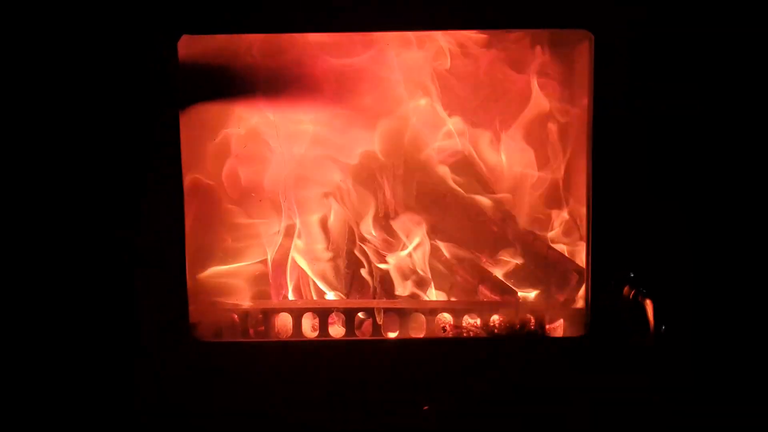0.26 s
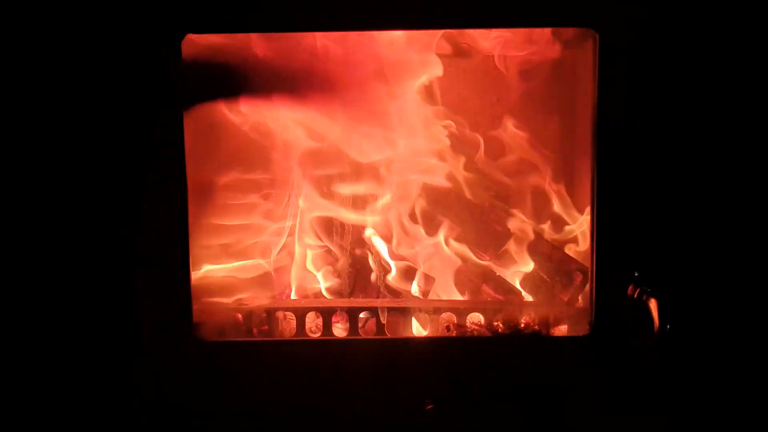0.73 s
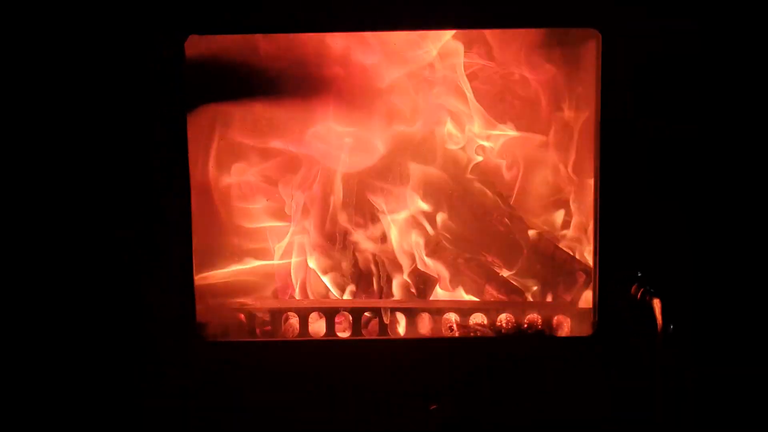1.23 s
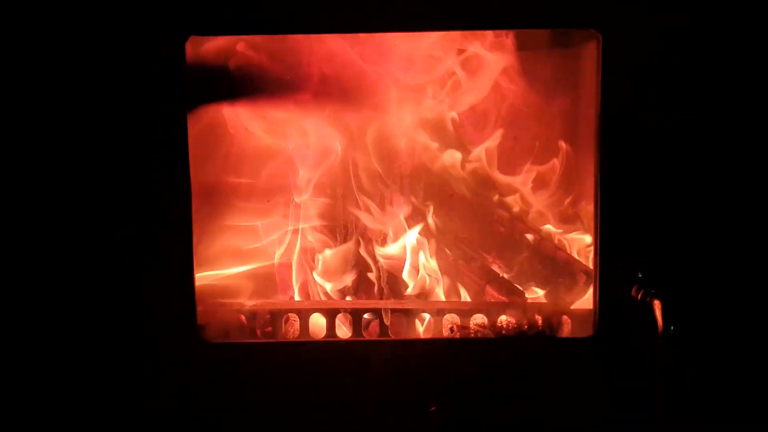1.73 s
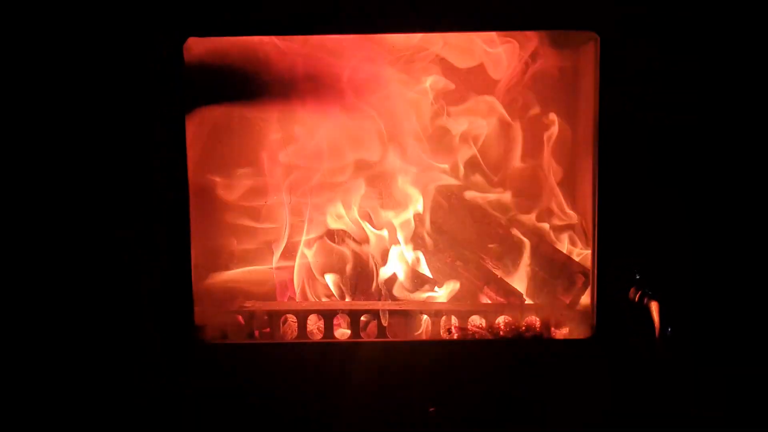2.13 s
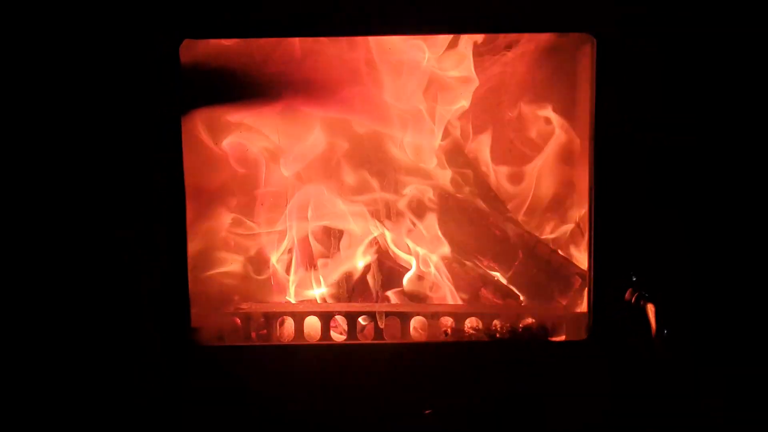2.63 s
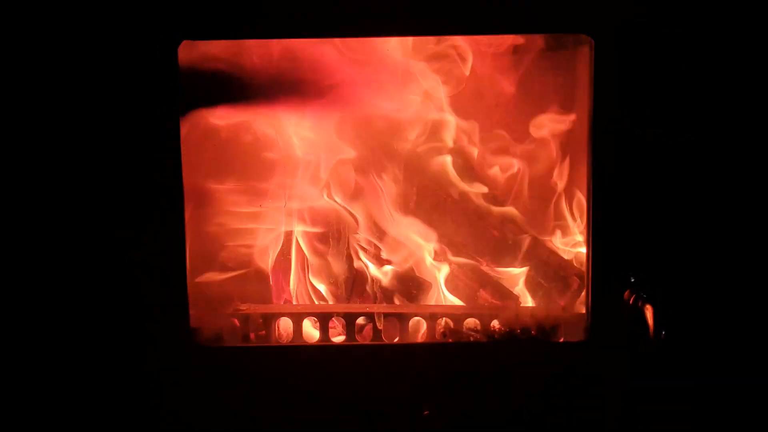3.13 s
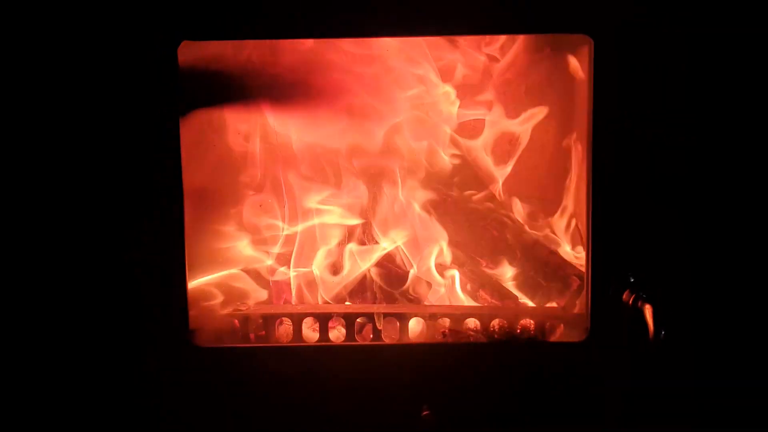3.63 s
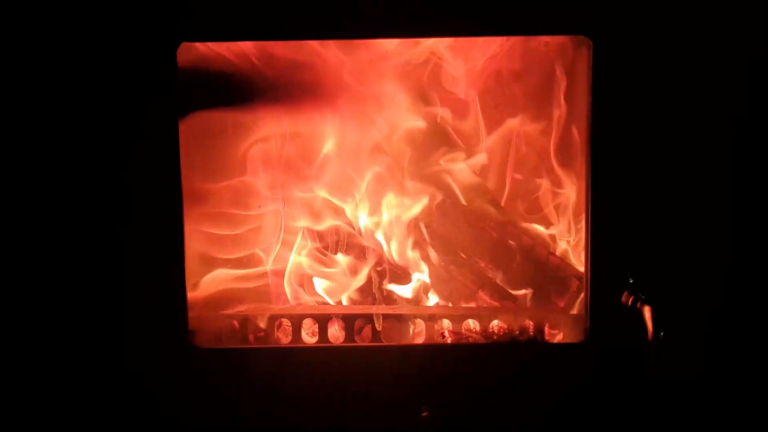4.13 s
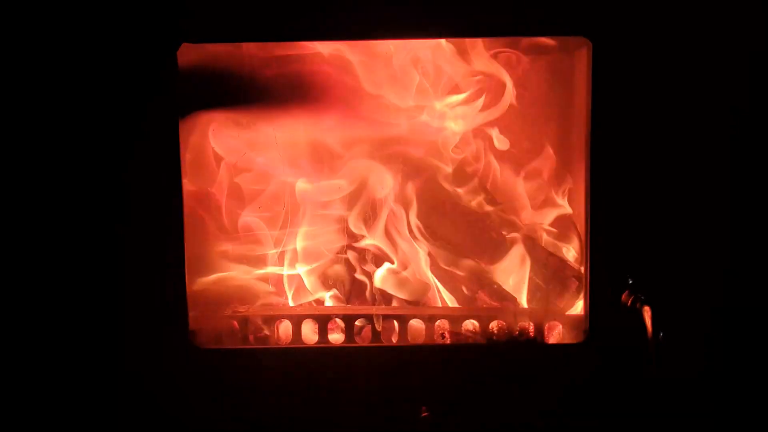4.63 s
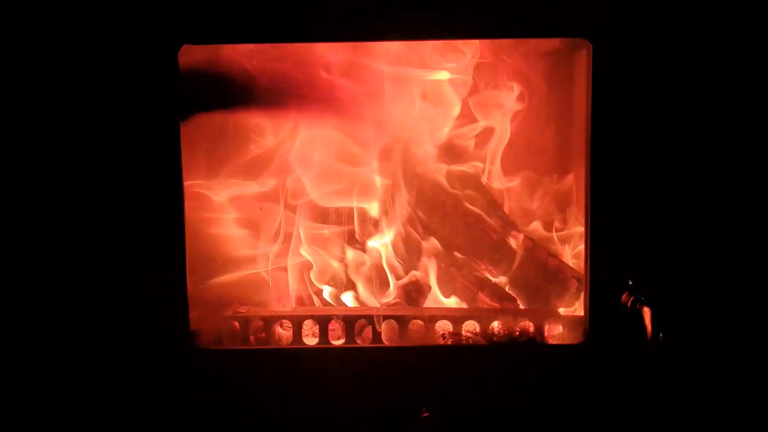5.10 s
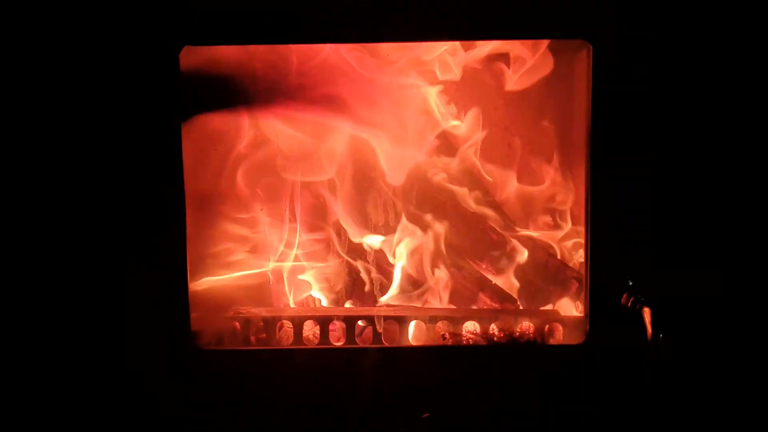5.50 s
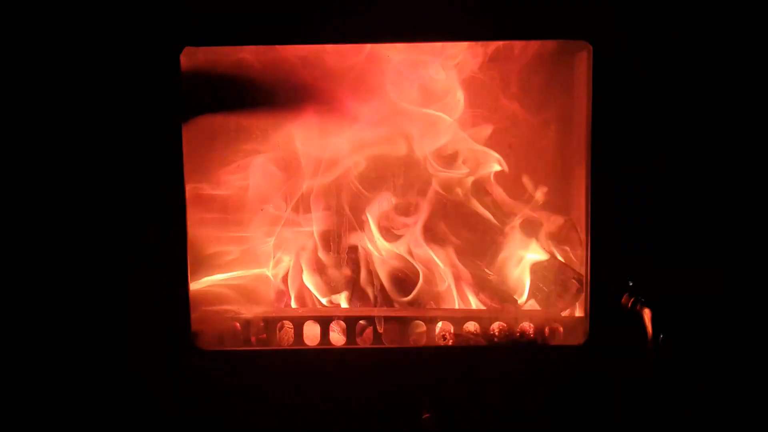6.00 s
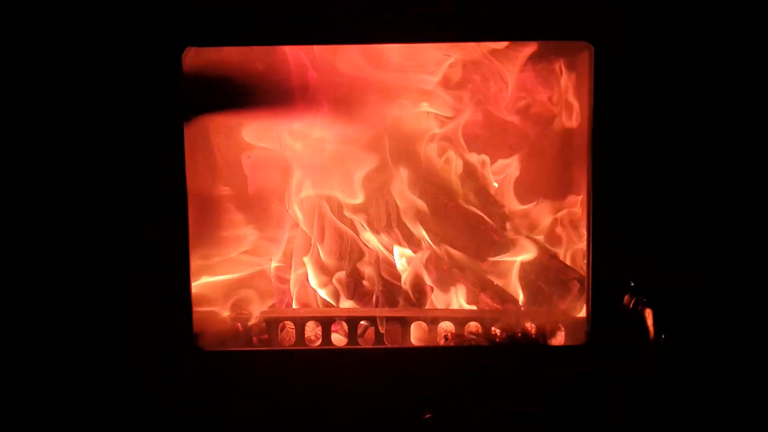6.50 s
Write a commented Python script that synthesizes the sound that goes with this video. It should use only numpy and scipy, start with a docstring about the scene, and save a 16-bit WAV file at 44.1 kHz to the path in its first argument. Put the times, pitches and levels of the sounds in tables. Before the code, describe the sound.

Indoors in a quiet room, a wood fire burns in a closed stove close to a stereo microphone. A very loud, hard crack bursts out at 0 seconds, booming in the firebox and dying quickly in the room. Below runs a continuous low rumble, hollow and fluttering, swelling around 2.6, 3.4 and 5.6 seconds and dipping near 2.0, 3.55 and 6.2. Tiny ticks, dull puffs and crisp splinter snaps sprinkle throughout. Medium snaps come between 0.5 and 1.4, stronger ones at 1.66 and 1.78, then a lull with only faint ticks until a rapid cluster at 2.53 to 2.6. A loud, rattly pop hits at 3.43, bright cracks at 4.15 and 4.56, smaller ones near 4.7, 5.07 and 5.5. After a sparser stretch, snaps return at 6.13 and 6.27, with light crackling to the end at about 6.7. Faint, steady microphone hiss lies underneath.

```python
"""In a quiet room, a wood fire burns in a closed stove, a short way from a stereo microphone.
Flames are shaped noise: a low rumble, and licks that ring the air resonances of the firebox.
Cracks and pops are short noise bursts with quick echoes and a dense rattle in the firebox;
each also booms in its air and dies away in the room. A faint hiss of the microphone lies beneath."""
import sys
import numpy as np
from scipy import signal
from scipy.fft import rfft, irfft
from scipy.io import wavfile
from scipy.ndimage import uniform_filter1d

SR = 44100
rng = np.random.default_rng(int(sys.argv[2]) if len(sys.argv) > 2 else 0)


def unload_audio(sound):
    """Save the sound as a 16-bit wav file, at the path given as the first command line argument."""
    columns = np.transpose(np.atleast_2d(sound))
    # keep every value between -1 and 1, then stretch to whole-number steps
    steps = np.round(np.clip(columns, -1, 1) * 32767)
    wavfile.write(sys.argv[1], SR, steps.astype(np.int16))


N = 297675  # length in samples

# strength of the flames, full on the boom and partial on the rumble: start_s, level_db
FLAME_SWELLS = [(0, -0.4), (0.6, 0.5), (1.2, 0), (1.75, -1), (2.03, -5), (2.2, 1.5), (2.6, 6), (3.0, 0.5),
                (3.38, 4.5), (3.55, -4.5), (4.1, 2), (4.8, -0.5), (5.1, 0.5), (5.6, 4), (5.8, -1.5),
                (6.17, -5), (6.4, 1), (6.75, 0)]
# spectrum of the low flame rumble, relative: freq_hz, density_db (per Hz)
RUMBLE_SPECTRUM = [(7.1, -13), (12, 2), (30, 6), (107, 0), (139, -18), (201, -11), (243, -13.5),
                   (285, -13.5), (400, -29), (520, -35), (880, -120)]
# air resonances of the firebox: freq_hz, width_hz, flame_fed_db, crack_struck_db
FIREBOX_MODES = [(141.1, 15.9, 1, 37), (277, 39, -10.5, 21), (409, 11, -23, 6.5), (573.3, 36, -27.5, 1),
                 (1114, 46.1, -26.5, 6)]
# spectrum of the microphone hiss, relative: freq_hz, density_db (per Hz)
HISS_SPECTRUM = [(180, -35), (300, 4), (441, -19.5), (512, -36.5), (595, -63), (983, -3), (1140, -25.5),
                 (1440, -38.5), (1980, -15), (2270, -17), (4730, -13.5), (5590, -18), (10200, -10),
                 (15000, -16.5), (16300, -34.5)]
# how alike the noise is in left and right: freq_hz, likeness (0 to 1)
STEREO_LIKENESS = [(60, 0.98), (700, .94), (2400, 1), (4400, 0.99), (8100, 0.56), (15000, 0.034)]
# larger cracks: start_s, level_db (relative, at 2.5 kHz), tilt_db (per octave),
# bend_db (per octave squared), depth_db (how deep in the firebox)
CRACKS = [(0.0014, 29, -1.5, -3, 2.5), (0.1954, -12, -1.5, -1.5, -4), (0.2181, -25, 1, 0, 0),
          (0.2654, -32, -3, 5, -4), (0.5418, -1.5, 3, -5.0, 19), (0.6867, -7.5, 2.5, -0.5, -0.5),
          (0.7342, -15, 1, 0, -1), (0.7749, 0, 7, -4, -1.5), (0.8146, -7.5, 7, -6, -14),
          (0.8303, -8.5, 1.5, -0.5, 1), (0.9225, -4, 6, -2, -2.5), (0.9869, -29.5, 8.5, 0.5, -4),
          (1.0859, -15.5, -4, -3, -4), (1.1828, -16.5, 8, -13, -1), (1.3541, -6, -3, -1.5, -1),
          (1.3966, -41, 4.5, 6.5, 3), (1.4846, -35.5, -8, 4.5, 0), (1.6582, 1, 2, 1.0, 3.5),
          (1.6988, -20.5, 2, 1.5, 0), (1.7761, 7.5, 3.0, -2.5, -5), (2.1027, -33, -5.5, 4, -1),
          (2.1858, -31, -7, 3, -1.5), (2.4058, -36.5, -8.5, 3.5, 1), (2.478, -32, 5, 2.0, -4),
          (2.5266, -6, -2.5, -1.0, -5.5), (2.5755, -6.5, 12, -5.5, 8), (2.5826, 2.5, 1.5, -0.5, -1),
          (2.5969, 2.5, 2, 0, -6.5), (2.842, -38, -10, 4.5, 2), (2.8882, -17, -1.5, -3.5, 1),
          (2.968, -28, 0, 2, -2), (2.9966, -29.5, -3, 4.0, 6), (3.0259, -10.5, 5.5, -6.5, -4),
          (3.2282, -15.5, 5, -2.5, -1), (3.2442, -22, -1, 1, 0.5), (3.2846, -27.5, 6.5, 0, 0),
          (3.2944, -19, -1.5, 1.5, -4), (3.3305, -19, 3, -0.5, -2), (3.3665, -22.5, 9, -4.0, 2),
          (3.4118, -13.5, 2.5, -1, 15), (3.4335, 8.5, 1.5, -3.0, 4.5), (3.7455, -32.5, 7, 1, 4),
          (3.8781, -8, 5.5, -2.5, 8), (3.9398, -22.5, 1.5, 2.0, 2), (3.9936, -28, -8, -1, 5),
          (4.1506, 6, 3.5, 0, -2), (4.1669, -12, 6, -2, 1), (4.3198, -37, -11, 1.5, -1),
          (4.3697, -26, 1.5, 0.5, -2), (4.4199, -24.5, 25, -12.5, -8), (4.5568, 3.5, 1.5, -1, -4.5),
          (4.6228, -21.5, -4, 3, -1), (4.684, -7.5, 0.5, -2, -1), (4.7682, -4.5, 3.5, -0.5, -1),
          (4.8233, -16.5, 4, -3.5, 0), (4.9426, -18, -12.5, -4, 0), (5.0725, -4.5, 6.5, -1, 3),
          (5.1956, -26, 13.5, -4.0, 1), (5.2356, -10.5, 3.0, -4.0, -1), (5.2548, -14, 4.5, -2, 3),
          (5.3964, -9, 0.5, -0.5, -1.5), (5.4355, -38, -9, 3, -2), (5.4955, -17.5, 1.5, -0.5, 9),
          (5.5161, -5.5, -0.5, -1.5, 2.5), (5.6634, -28, -11, 1, -9), (5.7808, -26.5, 2, 2.0, 1.5),
          (6.1309, -7, 4, -4, -8.5), (6.272, -1.5, 3.0, -2, -2), (6.3577, -20, 4, -5, 1),
          (6.4545, -15.5, 1.0, -1, 1), (6.5076, -20.5, 9.5, -3.5, 2), (6.5259, -12.5, 6.5, -2, 4),
          (6.6308, -10.5, 6, -3, -7), (6.6815, -35, -6.5, 4, 1)]
# points at which the tilt and bend of a crack are drawn: freq_hz
CRACK_COLOUR_HZ = (800, 1400, 2500, 3800, 5500, 8000, 11000)
# colour that the stove door and the microphone give every crack: freq_hz, width_hz, boost_db
DOOR_COLOUR = [(1134, 50, 0), (1934, 340, 4.5), (2730, 1500, 5.5), (4380, 1170, 4), (5700, 1000, -2.5),
               (7010, 1700, 5), (10930, 2300, 5.5)]
# first echoes off grate, door glass and hearth: delay_s, signed_gain
FIREBOX_ECHOES = [(.00028, -0.069), (.0018, 0.051), (.0038, -0.19)]
# phase between the two microphone ports: freq_hz, left_lead_rad
PORT_LEAD = [(1000, 0.073), (4000, 0.2), (6000, 1.1), (9500, 0.22), (12000, 1.72), (16000, 1.9)]
# decay of the room: freq_hz, t60_s
ROOM_DECAY = [(300, 0.33), (700, 0.3367), (1200, 0.35), (1600, 0.5), (2100, 0.412), (3200, 0.35),
              (4600, 0.39), (8000, 0.15), (15000, 0.33)]

BOOM_DB, RUMBLE_DB, HISS_DB = -39.5, -38, -56
RUMBLE_FOLLOWS, LICKS_FOLLOW = 0.4, 0.43  # share of the flame swells, in dB, that each layer takes
FLUTTER_PER_S, FLUTTER_DB = 24, 1.3  # random levels a second and their rms: the whole flame puffs together
# a deeper crack rattles more and reaches the ear more by the room
RATTLE_DB, ROOM_DB, ROOM_PER_DEPTH = -2.5, -0.8, 0.84
EDGE_HZ = 16300  # upper band limit


def gain_of(db):
    """Decibels to an amplitude factor."""
    return 10 ** (np.asarray(db) / 20)


def evened(x):
    """Scales to rms 1."""
    return x / np.sqrt(np.mean(x ** 2) + 1e-20)


def read(points, hz):
    """Value of a table at hz, on a log-frequency axis."""
    f, value = np.transpose(points)
    return np.interp(np.log(hz + 1), np.log(f + 1), value)


def add(mix, s, sound):
    """Mixes a sound in at time s."""
    part = mix[:, round(s * SR):][:, :sound.shape[1]]
    part += sound[:, :part.shape[1]]


def noise(spectrum, size, patchy_db, flicker_db):
    """Stereo noise from random short-time spectra, with drifting patches and a flicker shared by all bins."""
    frames = 4 * N // size + 5
    hz = np.fft.rfftfreq(size, 1 / SR)
    a, b, c, d, patches = rng.standard_normal((frames, len(hz), 5)).T
    patches = uniform_filter1d(patches, size=10, axis=0)  # across frequency
    patches = evened(uniform_filter1d(patches, size=8, axis=1))  # across time
    flicker = evened(uniform_filter1d(rng.standard_normal(frames), size=3))
    same = np.clip(read(STEREO_LIKENESS, hz), -1, 1)[:, None]
    left = a + 1j * b
    right = same * left + np.sqrt(1 - same ** 2) * (c + 1j * d)
    level_db = read(spectrum, hz)[:, None] + patchy_db * patches + flicker_db * flicker
    spectra = np.array([left, right]) * gain_of(level_db)
    return evened(signal.istft(spectra, nperseg=size, noverlap=3 * size // 4)[1][:, :N])


def ring(x, column):
    """Sum of the firebox resonances, each with unit peak gain times the level in one column."""
    total = 0
    for mode in FIREBOX_MODES:
        freq_hz, width_hz = mode[:2]
        b, a = signal.iirpeak(freq_hz, freq_hz / width_hz, SR)
        total = total + gain_of(mode[column]) * signal.lfilter(b, a, x)
    return total


def flames():
    """Turbulent burning: a broad rumble, and flickering noise that sounds the air modes of the firebox."""
    t = np.arange(N) / SR
    flutter = evened(np.interp(t, np.arange(200) / FLUTTER_PER_S, rng.standard_normal(200)))
    flutter = gain_of(FLUTTER_DB * flutter)
    swing = gain_of(np.interp(t, *np.transpose(FLAME_SWELLS)))

    rumble = noise(RUMBLE_SPECTRUM, size=4096, patchy_db=1.3, flicker_db=1.73)
    rumble = rumble * gain_of(RUMBLE_DB) * swing ** RUMBLE_FOLLOWS

    # (Hz, dB per Hz)
    low_spectrum = [(60, 3.5), (190, 3.5), (240, -30.0), (3000, -78.0)]
    lick_spectrum = [(60, -39), (190, -27.5), (240, 2.5), (1300, 0.5), (2200, -3.5), (4000, -28.5)]
    low = noise(low_spectrum, size=1024, patchy_db=1.5, flicker_db=3.0)
    licks = noise(lick_spectrum, size=256, patchy_db=4.5, flicker_db=3.0)
    drive = low * swing + gain_of(1) * licks * swing ** LICKS_FOLLOW
    boom = evened(ring(drive * flutter, column=2)) * gain_of(BOOM_DB)
    return rumble * flutter + boom


def hiss():
    """Faint, nearly steady noise of the microphone."""
    return gain_of(HISS_DB) * noise(HISS_SPECTRUM, size=512, patchy_db=0.3, flicker_db=2.0)


def small_cracks(per_s, level_db, spread_db, tilt_db, vary_db, bend_db):
    """Random faint events in the columns of the crack table."""
    when, size, colour = rng.random((round(60 * N / SR), 3)).T
    keep = np.arange(len(when)) < per_s * N / SR
    level = level_db - spread_db * np.log(np.maximum(size, 5e-2))
    tilt = tilt_db + vary_db * (2 * colour - 1)
    bend, depth = np.full_like(when, bend_db), np.full_like(when, 0.59)
    return np.transpose([when * N / SR, level, tilt, bend, depth])[keep]


def crack_colour(hz, level_db, tilt_db, bend_db):
    """Spectrum of one crack behind the door, in minimum phase so that nothing sounds ahead of the snap."""
    octaves = np.log2(np.array(CRACK_COLOUR_HZ) / CRACK_COLOUR_HZ[2])
    shape_db = tilt_db * octaves + bend_db * octaves ** 2
    bass = [(60, shape_db[0] - 29.5), (250, shape_db[0] - 6)]
    top = [(16000, shape_db[-1] - 3)]
    colour_db = read([*bass, *zip(CRACK_COLOUR_HZ, shape_db), *top], hz)
    colour_db = colour_db + sum(d / (1 + (2 * (hz - f) / w) ** 2) for f, w, d in DOOR_COLOUR)
    log_gain = np.log(gain_of(level_db - 4.5 + colour_db))
    mirrored = np.r_[log_gain, log_gain[-2:0:-1]]
    return np.conj(np.exp(signal.hilbert(mirrored)))[:len(hz)]


def snap(row, size=2048):
    """A short tearing burst, its first echoes and its dense rattle in the firebox; also a click for the room."""
    _, level_db, tilt_db, bend_db, depth_db = row
    rattle_db = RATTLE_DB + depth_db
    room_db = ROOM_DB + ROOM_PER_DEPTH * depth_db
    hz, t = np.fft.rfftfreq(size, 1 / SR), np.arange(size) / SR
    colour = crack_colour(hz, level_db, tilt_db, bend_db)

    common, left, right, grain = rng.standard_normal((4, size))
    tear = (t == 0) + .45 * grain * gain_of(-60 * t / .0022)  # a click, then 2.2 ms of grain
    tear = tear / np.linalg.norm(tear)
    # later echoes come back duller
    echoes = 1 + sum(g * np.exp(-2j * np.pi * hz * delay) / (1 + hz * delay / 30)
                     for delay, g in FIREBOX_ECHOES)

    swell = np.clip(t / 0.00074, 0, 1) * gain_of(-60 * t / 0.023) * (t < 3e-2)  # echoes build up, then die
    rattle = (common + 0.44 * np.array([left, right])) * swell
    rattle = gain_of(rattle_db) * rattle / np.linalg.norm(rattle[0])
    colour = colour / np.sqrt(1 + gain_of(2 * rattle_db))  # tear and rattle share the energy

    ports = np.exp(-1j * read(PORT_LEAD, hz) * np.array([[0], [1]]))
    near = irfft((rfft(rattle, axis=1) + rfft(tear) * echoes) * colour * ports, axis=1)
    click = gain_of(room_db) * irfft(colour)[None]
    return near[:, :-size // 8], click


def crackle(count=3):
    """All cracks, near and as answered by the room; cracks at other spots wake other echoes."""
    near, sent = np.zeros((2, N)), np.zeros((count, 1, N))
    ticks = small_cracks(per_s=47, level_db=-42.5, spread_db=1.5, tilt_db=4.5, vary_db=1.0, bend_db=0.1)
    # dull bursts of gas
    puffs = small_cracks(per_s=34, level_db=-44, spread_db=-0.5, tilt_db=-7, vary_db=1.5, bend_db=2.5)
    # splinters
    crisps = small_cracks(per_s=8, level_db=-30, spread_db=2.5, tilt_db=-2.0, vary_db=-1.5, bend_db=-0.1)
    for k, row in enumerate([*CRACKS, *ticks, *puffs, *crisps]):
        direct, click = snap(row)
        add(near, row[0], direct)
        add(sent[k % count], row[0], click)
    boom = ring(sent.sum(0), column=3)  # the low part of a crack sets the firebox air booming
    answer = sum(room(x + boom / count) for x in sent)
    return near * gain_of([[-.3], [.3]]) + boom + answer  # near sound leans slightly right


def room(x, late_db=-10):
    """Sparse taps of random sign, each band dying at its own speed; the far wall answers in a bunch."""
    taps = np.zeros((2, SR // 2))
    at = np.arange(200, SR // 2 - 10, 10)
    at = at + rng.integers(0, 10, (2, len(at)))
    np.put_along_axis(taps, at, rng.choice([-1., 1.], at.shape), 1)
    age = np.arange(SR // 2) / SR
    gather = np.clip(age / 0.012, 0, 1)
    far_wall = .5 * np.exp(-((age - .0172) / 0.00051) ** 2)
    taps = taps * (gather + far_wall)
    taps[1] = 0.56 * taps[0] + 0.71 * taps[1]  # the two ports are close together

    hz, t, z = signal.stft(taps, SR, nperseg=256)
    # furnishings colour the echoes: (Hz, dB)
    walls = [(1000, 0.0), (2200, -2.0), (3300, -3.0), (6000, 3.4), (14000, -5.0)]
    decay_db = read(walls, hz)[:, None] - 60 * t / read(ROOM_DECAY, hz)[:, None]
    tail = signal.istft(z * gain_of(decay_db), SR, nperseg=256)[1]
    tail = gain_of(late_db) * tail / np.linalg.norm(tail[0])
    return signal.fftconvolve(x, tail, axes=1)[:, :N]


def scene():
    """Flames, hiss and cracks together."""
    return flames() + hiss() + crackle()


def record(dry):
    """The input clips flat any peak beyond 0.9 of full scale; then a low-pass sets the band limit."""
    clipped = np.clip(dry, -.9, .9)
    low_pass = signal.firwin(511, EDGE_HZ, window=("kaiser", 9), fs=SR)
    return signal.oaconvolve(clipped, low_pass[None], "same")


dry = scene()
out = record(dry)
unload_audio(out)
```